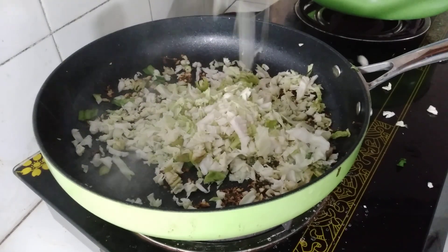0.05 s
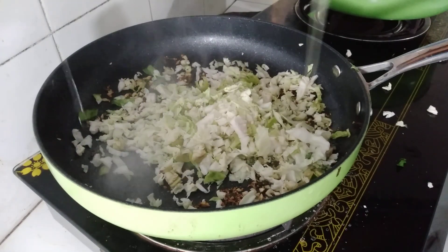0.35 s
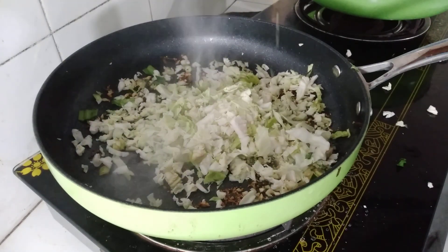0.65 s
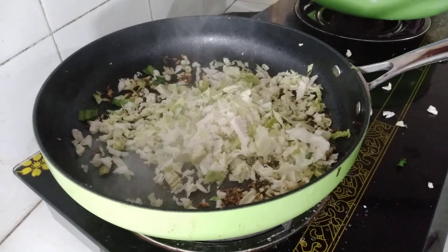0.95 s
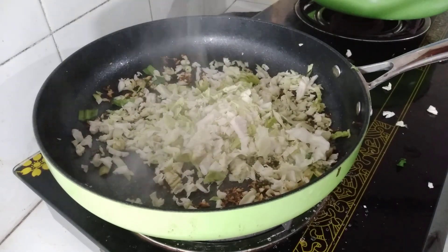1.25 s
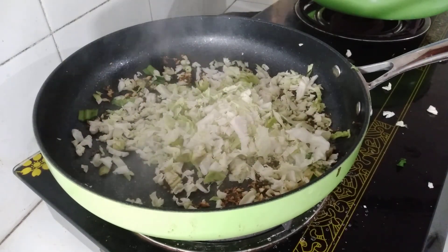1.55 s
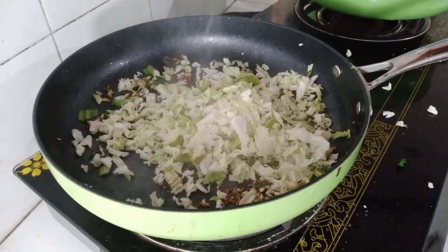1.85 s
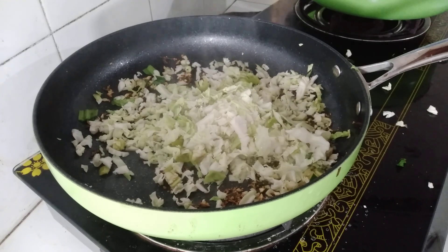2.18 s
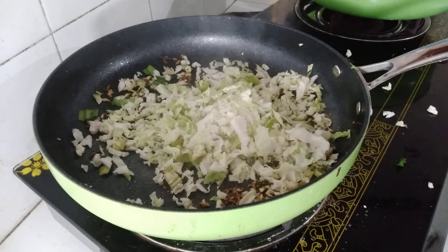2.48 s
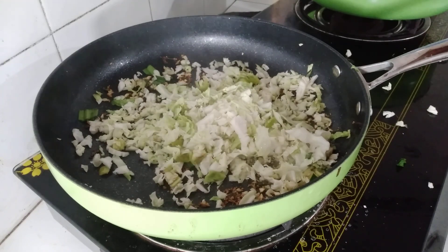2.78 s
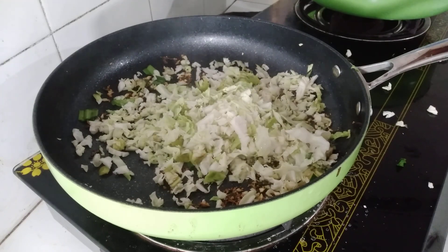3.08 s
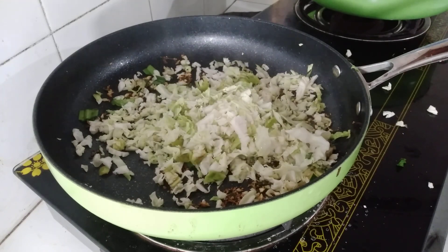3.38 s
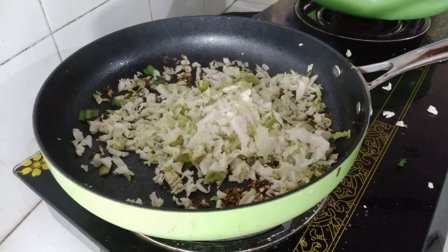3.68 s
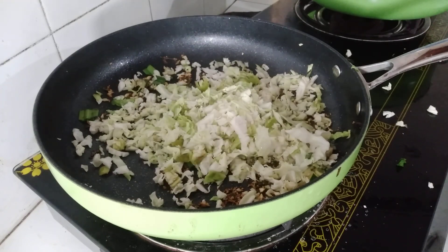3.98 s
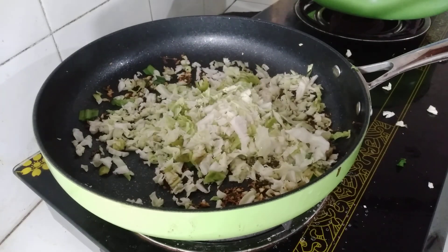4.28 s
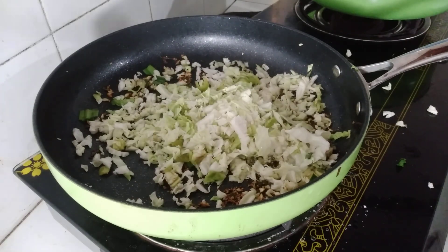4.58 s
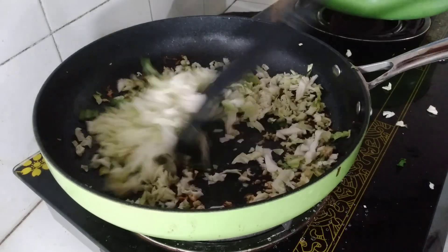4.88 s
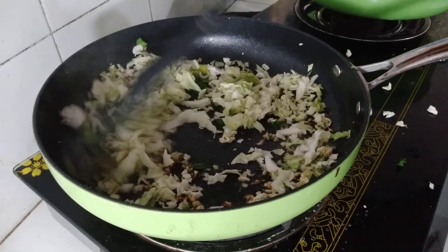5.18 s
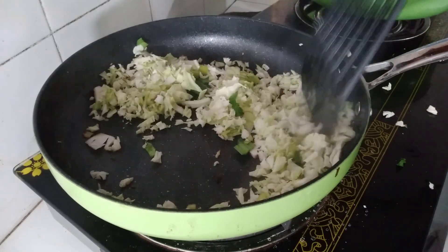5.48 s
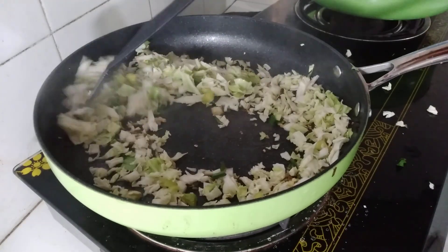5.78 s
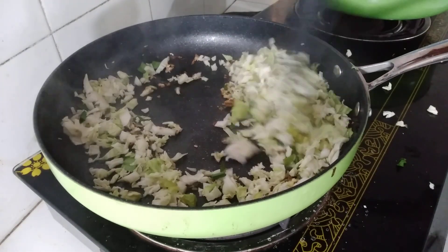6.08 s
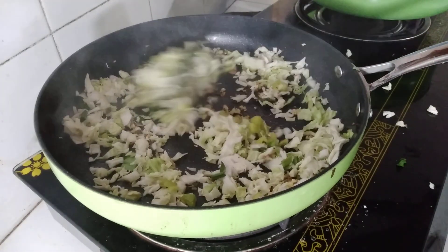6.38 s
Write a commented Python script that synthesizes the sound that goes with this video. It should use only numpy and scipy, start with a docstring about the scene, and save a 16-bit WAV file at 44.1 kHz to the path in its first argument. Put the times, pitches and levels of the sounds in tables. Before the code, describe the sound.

Cabbage fries with a fine crackle that settles, a cupboard door bumps shut, and a stirring spatula makes the sizzle flare.

```python
"""Shredded cabbage sizzles in oil in a non-stick pan, close up in a tiled kitchen.
Thousands of tiny steam bubbles burst each second; the sizzle settles as the leaves dry, then flares
as a spatula turns wet ones onto the hot metal. Single drops spit, and the spatula taps and scrapes.
Across the room something like a cupboard door bumps and shuts, its fainter bumps ringing with
short, hollow notes, over a low rumble."""
import sys
import numpy as np
from scipy import signal
from scipy.fft import rfft, irfft, next_fast_len
from scipy.io import wavfile
from scipy.ndimage import map_coordinates

SR = 44100
rng = np.random.default_rng(int(sys.argv[2]) if len(sys.argv) > 2 else 0)


def inscribe(sig):
    """Save sig as 16-bit PCM at rate SR to the path in sys.argv[1].

    A 1-D sig is mono; a 2-D sig holds one channel per row.
    Samples are clipped to [-1, 1] before scaling.
    """
    pcm = np.round(np.clip(np.atleast_2d(sig).T, -1, 1) * 32767)
    wavfile.write(sys.argv[1], SR, pcm.astype(np.int16))


N = 293265

BUBBLES_PER_S, DENSITY_TRACKING = 3200, 0.98  # at the mean level; how closely the rate follows the level
BLISTERS_PER_S, WET_BLISTERS_PER_S = 100, 900  # fresh leaves add many more
HEAP_LEAN_DB, HEAP_DRY_S = 1.4, .98  # the last handful lies left of centre and dries out


def sizzle():
    """Crackle over a fine fizz; more wet leaf on the metal makes it louder and denser."""
    wetness = np.exp(-np.arange(N) / SR / HEAP_DRY_S)
    level_db, lean_db = boiling(wetness)
    density = amp(DENSITY_TRACKING * (level_db - level_db.mean()))
    crackle = bubbles(per_second=BUBBLES_PER_S * density, scatter_db=6)
    fizz = unit(spread(rng.standard_normal((2, N)), blend_hz=1100))
    ticks = amp(-13) * blisters(per_second=BLISTERS_PER_S + WET_BLISTERS_PER_S * wetness, scatter_db=7.5)
    pair = stereo_tone(rim_bounce(crackle + fizz + ticks, strength=0.034 + 0.25 * wetness, spacing_hz=569))
    balance = amp(np.array([lean_db, -lean_db]) / 2)
    flicker_db = 0.52 * wobble(35) + 0.34 * wobble(9)
    return pair / np.std(pair.mean(0)) * balance * amp(level_db + flicker_db)


# The sizzle's base envelope, sinking as the leaves dry until they are turned: t/s, level/dB
BOIL_ENVELOPE = [(0, -26), (.68, -26.5), (1.55, -32), (3.1, -32.5), (4.86, -33.5), (4.99, -26), (6.65, -26)]
# Flare-ups as wet leaves land on hot metal: crest t/s, boost/dB, left minus right/dB
WET_FLARES = [(5.08, 3, 1), (5.41, 4.5, 0.3), (5.76, 2, 2.5), (6.09, 4.5, 2.4), (6.5, 2.5, 3.4)]


def boiling(wetness):
    """Water boils off the leaves, flaring where wet ones land: the sizzle's level and left lean in dB."""
    level_db = np.interp(np.arange(N) / SR, *np.transpose(BOIL_ENVELOPE))
    lean_db = HEAP_LEAN_DB * wetness
    for s, boost_db, side_db in WET_FLARES:
        flare = hump(s, rise_s=0.14, fall_s=.1)
        level_db += boost_db * flare
        lean_db += side_db * flare
    return level_db, lean_db


def bubbles(per_second, scatter_db, spots=16):
    """Steam bubbles of very unequal size burst at random; each spot of the pan has its own pitch."""
    pair = np.zeros((2, N))
    for hz in np.geomspace(1100, 14000, spots):
        fires = rng.random(N) < per_second / (spots * SR)
        sizes = amp(scatter_db * np.minimum(rng.standard_normal(N), 2.3)) * rng.choice([-1, 1], N)
        route = pan_path(scatter_db=-1, t60_s=0.012)
        pop = signal.fftconvolve(burst(hz, ring=1, cycles=1), route, axes=1)
        pair += signal.oaconvolve((fires * sizes)[None], pop, axes=1)[:, :N]
    return unit(pair / np.sqrt(per_second))  # the rate sets density, not loudness


def blisters(per_second, scatter_db, spots=6):
    """Bigger pockets of steam lift the leaves with soft, low ticks."""
    pair = np.zeros((2, N))
    for hz in np.geomspace(600, 1700, spots):
        fires = rng.random(N) < per_second / (spots * SR)
        sizes = amp(scatter_db * np.minimum(rng.standard_normal(N), 1.5))
        route = pan_path(scatter_db=-15.5, t60_s=0.028)
        tick = signal.fftconvolve(burst(hz, ring=5, cycles=0.37), route, axes=1)
        pair += signal.oaconvolve((fires * sizes)[None], tick, axes=1)[:, :N]
    return unit(pair)


def burst(hz, ring, cycles, size=256):
    """A bubble breaks: a sharp click and a ring of a cycle or two."""
    t = np.arange(size) / SR
    tone = np.cos(2 * np.pi * hz * t) * np.exp(-t * hz / cycles)
    return ((t == 0) + ring * tone / np.linalg.norm(tone))[None]


def pan_path(scatter_db, t60_s, size=1024, max_lag=9):
    """Stereo response of one spot of the pan: the direct click, then scatter off the rim and tiles."""
    t = np.arange(size) / SR
    scatter = rng.standard_normal((2, size)) * amp(-60 * t / t60_s)
    scatter = amp(scatter_db) * scatter / np.linalg.norm(scatter[0])
    response = np.pad(scatter, ((0, 0), (2 * max_lag, 0)))
    lag = rng.integers(-max_lag, max_lag + 1)  # in samples; places the spot left or right
    response[0, max_lag + lag] += 1
    response[1, max_lag - lag] += 1
    return response


def rim_bounce(pair, strength, spacing_hz):
    """The pan wall returns the sound under 2 ms late, which ripples the spectrum."""
    bounce = filtered(pair, lambda hz: np.exp(-2j * np.pi * hz / spacing_hz) / (1 + (hz / 4500) ** 4))
    return pair + strength * bounce


# Frying EQ on the left, a high sheen: f/Hz, relative level/dB
LEFT_EQ = [(100, -23), (400, -26), (800, -20), (1400, -21), (1800, -17), (3000, -11), (4800, -8.5),
           (6200, -6.5), (7000, -3), (7600, 0.5), (8400, -6), (10000, -18.5), (12500, -25.5), (15700, -20)]
# Frying EQ on the right, an upper-mid bite: f/Hz, relative level/dB
RIGHT_EQ = [(100, -33), (400, -27), (700, -21), (950, -18), (1450, -16.5), (1800, -9), (2100, -10),
            (2900, -2), (4500, -2), (6000, -8.5), (7400, -16), (8200, -15.5), (10000, -20.5),
            (15700, -27.5)]


def stereo_tone(pair):
    """Each microphone port colours the frying in its own way."""
    return np.array([colour(pair[0], LEFT_EQ), colour(pair[1], RIGHT_EQ)])


# The featured spits: t/s, peak level/dB, f/Hz, left minus right/dB
LOUD_SPITS = [(0.6124, -6, 5300, 1), (0.9302, -8, 3000, -3), (1.3167, -10, 4200, -1),
              (1.3895, -9, 3900, -1), (2.027, -11, 6000, 5), (2.1594, -6.5, 4400, -6), (3.438, -4, 3900, 0),
              (3.499, -9.5, 5200, 0.5), (4.2818, -10, 5400, -4.5), (4.4431, -11, 3400, 2),
              (5.4088, -6, 5500, 0), (5.4845, -3.5, 3630, -4), (6.1597, -1, 4000, 0)]


def spits():
    """A drop of water explodes in the oil: a sharp click and the lower plop of its steam."""
    track = np.zeros((2, N))
    for s, db, hz, side_db in LOUD_SPITS + stray_drops():
        route = pan_path(scatter_db=-1.5, t60_s=.007, max_lag=1)
        click = burst(hz, ring=0.63, cycles=0.36)
        plop = amp(-17) * burst(hz / 2.5, ring=5, cycles=0.45)
        balance = amp([[side_db / 2], [-side_db / 2]])
        pop = stereo_tone(signal.fftconvolve(click + plop, route, axes=1)) * balance
        add(track, s, amp(db) * pop / np.abs(pop).max())
    return track


def stray_drops(per_second=4, peak_db=-15.5, scatter_db=2.5, hz=4600, scatter_octaves=.3, count=64):
    """Lesser drops spit at random intervals: rows like those of LOUD_SPITS."""
    times = np.cumsum(rng.exponential(size=count)) / per_second
    return [(s, peak_db + scatter_db * size, hz * 2 ** (scatter_octaves * pitch), side_db)
            for s, (size, pitch, side_db) in zip(times, rng.standard_normal((count, 3))) if s < N / SR]


# Spatula taps and the low thump of a loud spit: t/s, peak level of the low body/dB
PAN_KNOCKS = [(0.672, -30.5), (1.353, -34), (3.434, -33.5), (4.423, -35), (5.249, -23), (5.48, -20),
              (5.94, -26), (6.055, -25.5), (6.121, -30), (6.156, -27), (6.451, -29), (6.547, -24.5)]
# Tone of a knock in the laden pan: f/Hz, relative level/dB
KNOCK_EQ = [(25, 7.5), (60, 6.5), (130, -4), (350, 2.5), (650, -0.5), (1000, 0), (1400, 2), (3000, 6),
            (7000, -2), (14000, -20)]


def pan_knocks():
    """Short, dry knocks in a pan damped by its load: spatula taps and the low thump of a loud spit."""
    track = np.zeros((2, N))
    for s, db in PAN_KNOCKS:
        contact = np.pad(pan_path(scatter_db=0.5, t60_s=0.013), ((0, 0), (0, SR // 20)))
        knock = np.array([colour(side, KNOCK_EQ) for side in contact])
        body = filtered(knock.mean(0), lambda hz: (hz > 200) & (hz < 1500))
        add(track, s + .002, amp(db) * knock / np.abs(body).max())
    return track


# The spatula ploughing across the pan: start t/s, length/s, scrape level at the crest/dB
SPATULA_STROKES = [(4.93, 0.17, -61), (5.1, 0.28, -41), (5.445, 0.14, -68), (5.677, 0.27, -53),
                   (5.912, 0.42, -49), (6.415, 0.16, -55)]
# Tone of plastic rubbing on the coating: f/Hz, relative level/dB
SCRAPE_EQ = [(50, -16), (160, 5), (330, 2.5), (500, -7), (900, 4), (2000, -1), (6000, -24)]


def strokes(air_db=-43.5):
    """The blade judders over the coating, and the moving hand pushes a low puff of air."""
    track = np.zeros((2, N))
    for s, length_s, scrape_db in SPATULA_STROKES:
        progress = np.clip((np.arange(N) / SR - s) / length_s, 0, 1)
        swell = np.sqrt(np.abs(np.sin(np.pi * progress)))
        judder = spread(rng.standard_normal((2, N)), blend_hz=700) * amp(3.5 * wobble(160))
        scrape = unit(filtered(judder, lambda hz: amp(along(SCRAPE_EQ, hz))))
        air = unit(filtered(judder, lambda hz: 1 / (1 + (hz / 24) ** 3)))
        track += swell * (amp(scrape_db) * scrape + amp(air_db) * air)
    return track


# Wooden bumps across the room: t/s, level over the first 0.1 s/dB, low-pass f/Hz, freedom to ring/0-1
WOOD_BUMPS = [(0.15, -45, 600, 1), (2.516, -39.5, 600, 0.85), (2.715, -28.5, 370, 0.85),
              (2.894, -21, 960, 1), (4.057, -44.5, 1500, 0.97), (5.25, -41.5, 1700, 0.32)]
# The wood's resonances: f/Hz, relative level/dB, t60/s
WOOD_MODES = [(53, -11, .8), (103, -4, .7), (122, -7, .7), (192, -6, .6), (246, -8, .7), (284, 0, .65),
              (424, -7, .45), (475, -4, .35), (537, -8, .55), (618, 3, .4), (727, -9, .6), (803, -5, .46),
              (915, -12, .42), (1109, -9, .45)]
# Dull body of a bump: f/Hz, relative level/dB
THUD_EQ = [(25, -24), (50, -6), (90, -6), (160, -3), (300, -4), (650, 1.5), (900, -3), (1300, -4),
           (2500, -5.5), (5000, -44)]


def bumps():
    """Blows on wood, heard mostly through the room; each has its own brightness and ring length."""
    track, t = np.zeros((2, N)), np.arange(SR) / SR
    build_up = 1 - .6 * np.exp(-t / .025)  # the reflections take a moment to gather
    for s, db, bright_hz, freedom in WOOD_BUMPS:
        ring = 0
        for hz, mode_db, t60 in WOOD_MODES:
            phase = 2 * np.pi * rng.random() + rng.normal(0, .6, (2, 1))
            strength_db = mode_db + rng.normal(0, 1.2)
            ring += amp(strength_db - 60 * t / t60) * np.sin(2 * np.pi * hz * t + phase)
        thud = filtered(room_tail(), lambda hz: amp(along(THUD_EQ, hz)))
        blow = unit(thud) + amp(-3) * unit(ring)
        blow = filtered(blow, lambda hz: 1 / np.sqrt(1 + (hz / bright_hz) ** 4))
        damping = amp(-100 * t * (1 / freedom - 1))
        blow = blow * build_up * damping
        add(track, s, amp(db) * blow / np.std(blow[:, :SR // 10]))
    return track


# Hollow ringing notes of the fainter wooden bumps: t/s, level/dB, f/Hz
BUMP_RINGS = [(0.15, -40.5, 182.7), (4.055, -39, 423), (4.06, -44, 305), (5.249, -40.5, 321.5)]


def bump_rings(attack_s=0.012, t60_s=0.6):
    """The fainter bumps ring at their own pitches: short, hollow, slightly rough notes."""
    track, t = np.zeros((2, N)), np.arange(SR // 2) / SR
    for s, db, hz in BUMP_RINGS:
        phase = 2 * np.pi * hz * t + 0.64 * wobble(90)[:len(t)] + rng.normal(0, .3, (2, 1))
        envelope = amp(db - 60 * t / t60_s) * (1 - np.exp(-t / attack_s))
        add(track, s, envelope * np.sin(phase))
    return track


# Reverb decay of the tiled kitchen: f/Hz, t60/s
KITCHEN_DECAY = [(60, 0.69), (130, 1.24), (350, 0.73), (900, 0.64), (3000, 0.19), (12000, 0.24)]


def room_tail():
    """The kitchen's diffuse reverb: each frequency dies at its own speed."""
    hz, t, noise = signal.stft(rng.standard_normal((2, SR)), SR, nperseg=512)
    decay = amp(-60 * t / along(KITCHEN_DECAY, hz)[:, None])
    _, tail = signal.istft(noise * decay, SR, nperseg=512)
    return spread(tail[:, :SR], blend_hz=836)


# Bass-heavy room tone: f/Hz, relative level/dB
RUMBLE_EQ = [(15, -0.5), (30, -4.5), (38, -14), (53, 7.5), (66, -2), (90, -2.5), (125, -9), (200, -12.5),
             (400, -26), (1000, -43), (3000, -80)]


def rumble(steady_db=-54.5, settle_s=.9):
    """The kitchen's low, restless bed: it starts louder, settles, and swells once, briefly."""
    early_db = 7 * np.exp(-np.arange(N) / SR / settle_s)
    swell_db = 6.5 * hump(1.96, rise_s=0.11, fall_s=0.11)
    noise = spread(rng.standard_normal((2, N)), blend_hz=600)
    bed = unit(filtered(noise, lambda hz: amp(along(RUMBLE_EQ, hz))))
    return bed * amp(steady_db + early_db + swell_db + wobble(6.4))


def amp(db):
    """Decibels to gain."""
    return 10 ** (np.asarray(db) / 20)


def unit(x):
    """Scale to rms 1."""
    return x / np.sqrt(np.mean(x ** 2) + 1e-20)


def along(points, hz):
    """Interpolate (Hz, value) points on a log frequency axis."""
    f, v = np.transpose(points)
    return np.interp(np.log(hz + 1), np.log(f + 1), v)


def wobble(rate):
    """A smooth random curve, rate knots a second."""
    return map_coordinates(rng.standard_normal(4096), [np.arange(N) * rate / SR], mode="mirror")


def hump(s, rise_s, fall_s):
    """A smooth swell from 0 to 1 and back, with its crest at time s."""
    t = np.arange(N) / SR - s
    return np.exp(-(t / np.where(t < 0, rise_s, fall_s)) ** 2)


def filtered(x, response):
    """Filter x by a response given as a function of Hz."""
    n = x.shape[-1]
    m = next_fast_len(n + 8192)
    return irfft(rfft(x, m) * response(np.fft.rfftfreq(m, 1 / SR)), m)[..., :n]


def colour(x, eq, size=2048):
    """Minimum-phase EQ of energy 1: nothing rings ahead of a click."""
    gains = amp(along(eq, np.fft.rfftfreq(size, 1 / SR)))
    cepstrum = irfft(np.log(gains))
    fold = np.r_[1, np.full(size // 2 - 1, 2), np.zeros(size // 2)]
    kernel = irfft(np.exp(rfft(cepstrum * fold)))
    return signal.oaconvolve(x, kernel / np.linalg.norm(kernel))[:len(x)]


def spread(pair, blend_hz):
    """Two unrelated signals become alike in the bass, where waves dwarf the left-right spacing."""
    def mid_side_gains(hz):
        correlation = .82 / (1 + (hz / blend_hz) ** 4)
        angle = np.arccos(correlation) / 2
        return np.array([np.cos(angle), np.sin(angle)])
    mid, side = filtered(pair, mid_side_gains)
    return np.array([mid + side, mid - side])


def add(track, s, sound):
    """Mix a stereo sound into the track at time s."""
    start = max(round(s * SR), 0)
    track[:, start:start + sound.shape[1]] += sound[:, :max(N - start, 0)]


def scene():
    """The pan up front, its faint reverb, and the room's own sounds behind."""
    pan = sizzle() + spits() + pan_knocks() + strokes()
    tail = room_tail()
    reverb = signal.fftconvolve(pan, tail / np.linalg.norm(tail[0]), axes=1)[:, :N]
    return pan + amp(-15.5) * reverb + bumps() + bump_rings() + rumble()


def record(dry, ceiling=.85, top_hz=15950):
    """A soft clip rounds off the very highest peaks, then a steep low-pass cuts the extreme treble."""
    rounded = dry / (1 + np.abs(dry / ceiling) ** 6) ** (1 / 6)
    return filtered(rounded, lambda hz: hz < top_hz)


dry = scene()
out = record(dry)
inscribe(out)
```